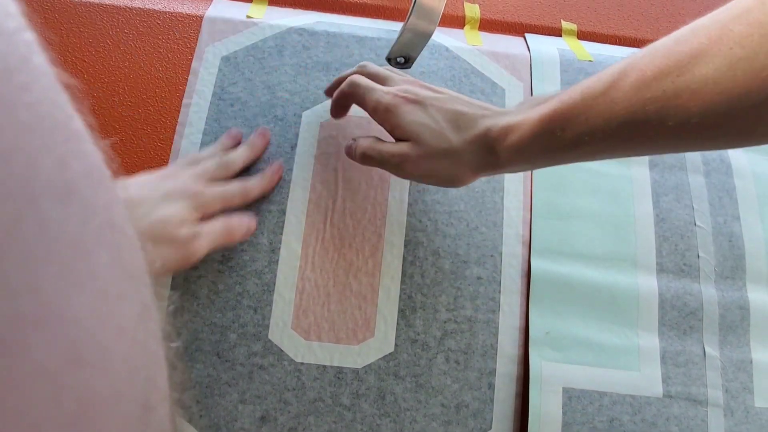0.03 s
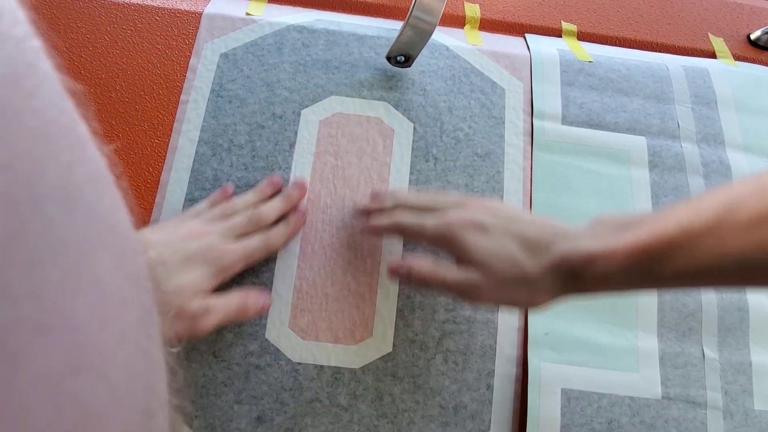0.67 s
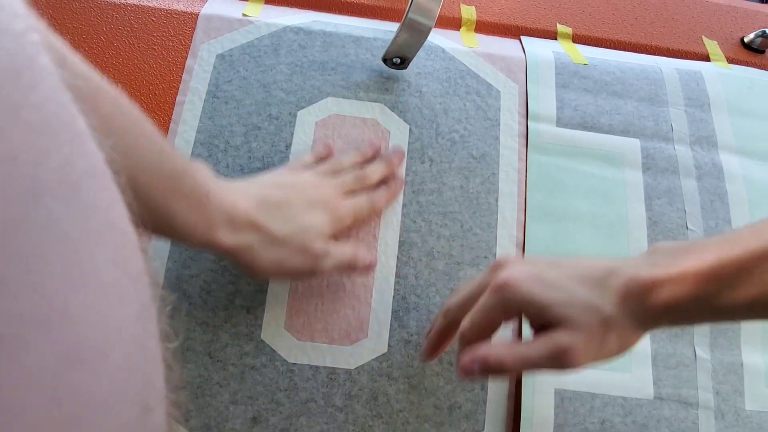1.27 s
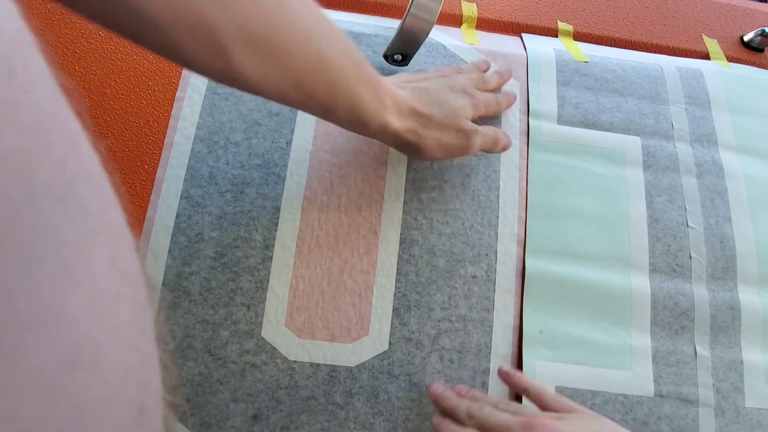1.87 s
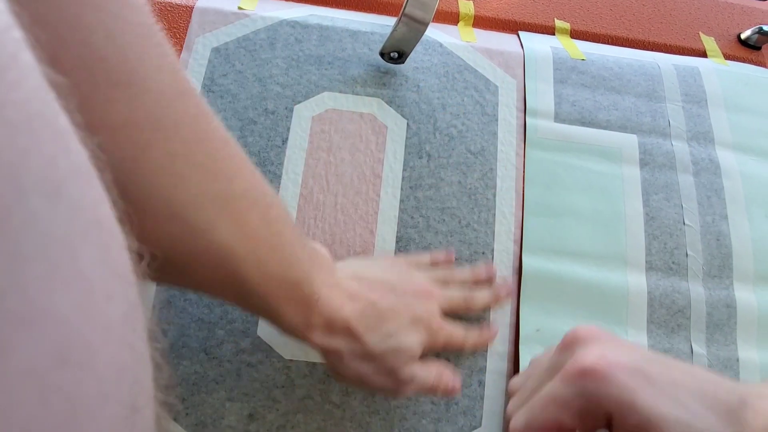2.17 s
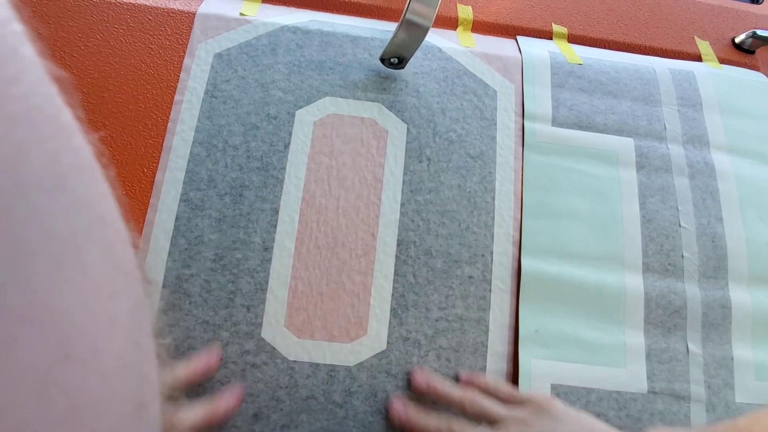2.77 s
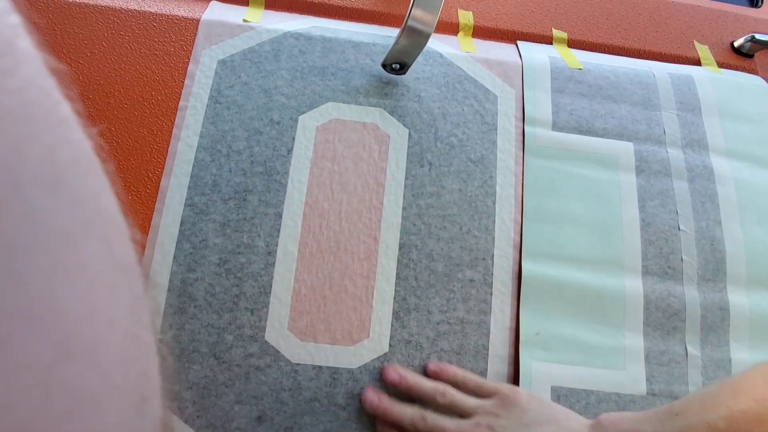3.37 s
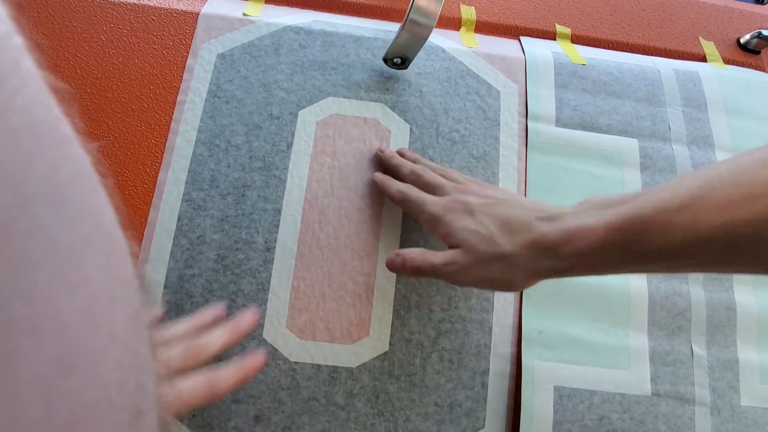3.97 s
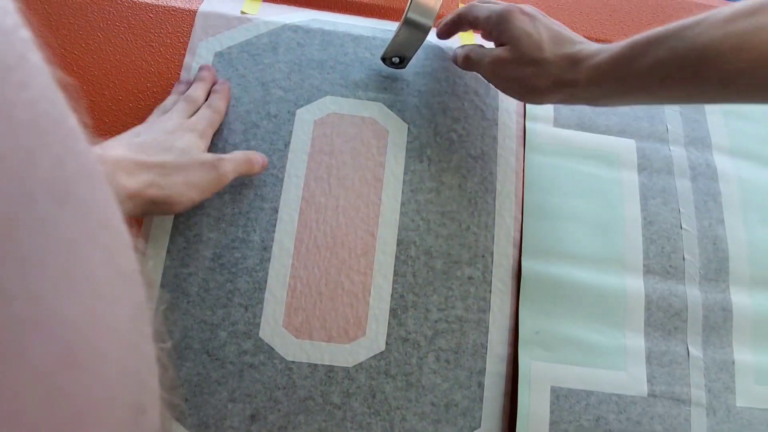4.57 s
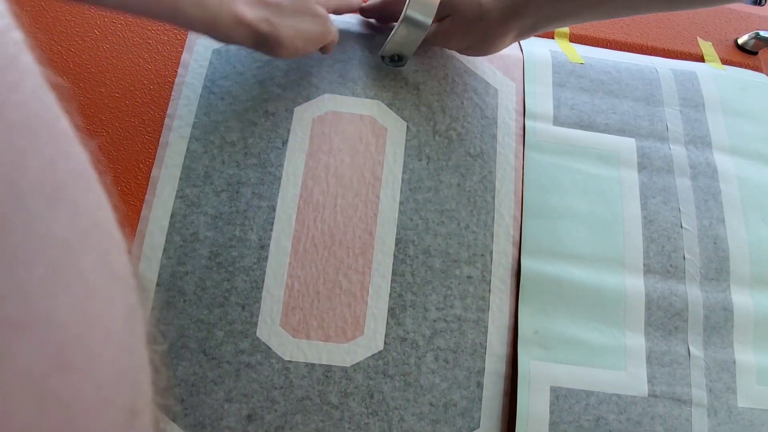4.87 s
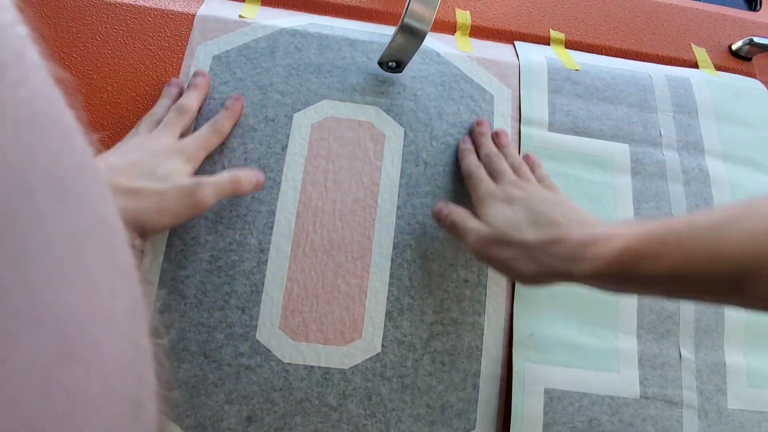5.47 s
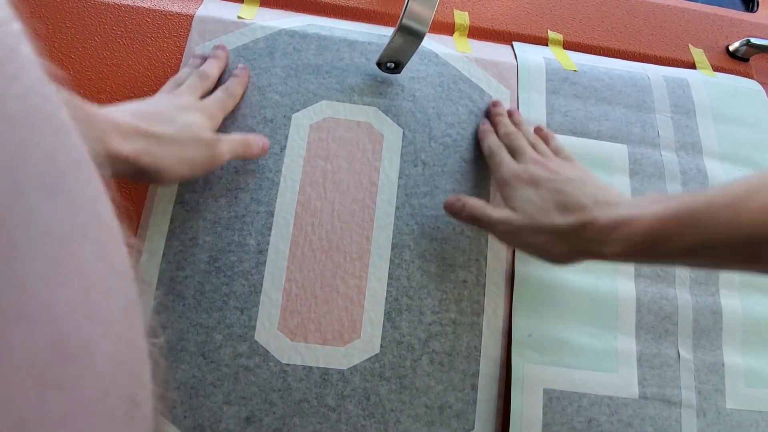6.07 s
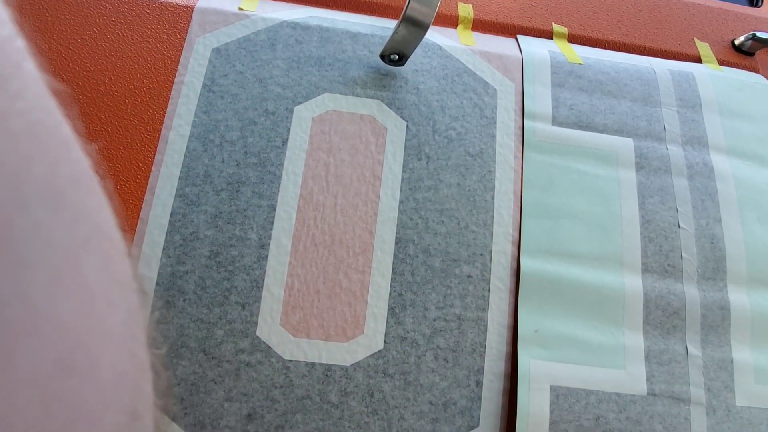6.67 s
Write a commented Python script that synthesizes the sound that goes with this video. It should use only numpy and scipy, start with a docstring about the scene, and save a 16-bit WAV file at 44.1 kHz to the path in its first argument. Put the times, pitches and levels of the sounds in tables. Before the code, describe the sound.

Palms thump softly onto paper laid over a hollow panel and slide across it in a steady run of short, hissing rubs. The textured surface adds a low, boxy shudder, while fingers catch the paper with little ticks and bright scrapes, and gripping skin briefly groans. The microphone is close and in stereo, buffeted a few times by air, most strongly before the middle. A faint outdoor background lies underneath.

```python
"""Outdoors, close up on a hollow, textured panel: two hands smooth a paper-backed vinyl decal onto it.
Each palm lands with a soft thump and a bright pat, then hisses over the paper and sets the panel juddering.
Gripping skin groans, the paper ticks and crinkles, and the right hand gives short, bright scrapes.
An arched palm turns the rub hollow. Puffs of air buffet either microphone port, over a faint outdoor bed."""
import sys
import numpy as np
from scipy import signal
from scipy.fft import rfft, irfft, next_fast_len
from scipy.io import wavfile
from scipy.ndimage import uniform_filter1d, map_coordinates

SR = 44100
rng = np.random.default_rng(int(sys.argv[2]) if len(sys.argv) > 2 else 0)


def master_out(mix):
    """Clip the mix to full scale and print it as 16-bit PCM to the path in sys.argv[1]."""
    frames = np.transpose(np.atleast_2d(mix))
    ceiling = np.clip(frames, -1, 1)
    pcm = np.round(ceiling * 32767).astype(np.int16)
    wavfile.write(sys.argv[1], SR, pcm)


N = 295911

# Tone of the open-air bed: f/Hz, level/dB
AIR_EQ = [(25, -31), (70, 4), (400, -19.5), (750, -25), (1400, -29.5), (2100, -41.5), (5200, -27),
          (7400, -53), (15000, -72)]
# Palm strokes: t/s, length/s, speed-up/s, slow-down/s, right hiss/dB, left rasp/dB,
# first comb peak of the right hand's reflection at the start/Hz, at the end/Hz
STROKES = [(-0.024, 0.44, 0.19, 0.21, -36.5, -51.5, 1300, 750),
           (0.333, 0.406, 0.13, 0.093, -34.5, -49.5, 1400, 1800),
           (0.651, 0.385, 0.16, 0.15, -36.5, -51, 1360, 2700),
           (0.984, 0.43, 0.15, 0.17, -36, -52, 1400, 1800),
           (1.256, 0.42, 0.19, 0.079, -36.5, -54, 1420, 2800),
           (1.648, 0.405, 0.14, 0.14, -34.5, -52.5, 900, 900), (2.05, 0.41, 0.11, 0.07, -35, -54, 900, 800),
           (2.39, 0.21, 0.097, 0.17, -47.5, -53, 1700, 1750),
           (2.695, 0.355, 0.1, 0.12, -34.5, -51.5, 1600, 3000),
           (3.242, 0.49, 0.22, 0.3, -33, -54, 1800, 1350), (3.64, 0.17, 0.06, 0.06, -69, -57, 1700, 1700),
           (3.8, 0.3, 0.1, 0.17, -41, -56, 1700, 1750), (4.138, 0.283, 0.12, 0.097, -37.5, -60, 1100, 800),
           (4.405, 0.49, 0.23, 0.27, -39, -56, 2000, 1500), (4.983, 0.55, 0.34, 0.22, -40, -59, 1400, 900),
           (5.294, 0.651, 0.44, 0.15, -35.5, -56, 1000, 1300),
           (6.155, 0.475, 0.2, 0.08, -35.5, -56.5, 1400, 1900)]
# Tone of the right hand's airy hiss: f/Hz, level/dB
HISS_EQ = [(3000, -40), (8000, -18.5), (10300, -7.5), (11700, -0.5), (13300, -1.5), (15500, -1)]
# Tone of the right hand's rasp: f/Hz, level/dB
RIGHT_RASP_EQ = [(300, -20), (800, -5), (1300, -7), (2200, -7), (4500, 0), (6000, 3), (7800, -5),
                 (9300, -3), (15000, -30)]
# Tone of the left hand's rasp: f/Hz, level/dB
LEFT_RASP_EQ = [(300, -34), (800, 2.5), (1650, 0), (2350, -6.5), (5000, 4), (6200, -4.5), (7450, -22),
                (8400, -8), (15500, -16)]
# Resonance of the air pocket under the left palm: t/s, f/Hz
POCKET_SWEEP = [(1.5, 2450), (3.95, 1650), (4.6, 1720), (5.15, 745), (5.45, 940), (6.5, 2100)]
# The panel's boomy lowest modes: f/Hz, width/Hz, level/dB
LOW_MODES = [(62, 28.4, 3.5), (111.6, 64, -5)]
# The panel's boxy upper modes: f/Hz, width/Hz, level/dB
UPPER_MODES = [(181.7, 48, 1), (231, 60.7, 2), (331, 66, -1.5), (418, 97, -5.5), (713, 360, -19)]
# Palms landing: t/s, thump level/dB, f/Hz, pat level/dB
LANDINGS = [(0, -25.5, 90, -83), (0.708, -28.5, 72.7, -48), (1.02, -31.5, 71, -77), (1.334, -29, 68, -54),
            (1.675, -21.5, 72.4, -58), (2.054, -22, 68.3, -51), (2.7, -27, 76, -53),
            (2.742, -23.5, 67, -53), (3.276, -39.5, 67, -55), (3.821, -32, 170, -62),
            (3.838, -36, 70.2, -74), (4.151, -25, 72.5, -58), (4.455, -21, 107.5, -54.5),
            (5.075, -30, 103, -80), (5.138, -19.5, 135, -48), (6.177, -34, 72.8, -58.5)]
# Skin gripping: centre t/s, level/dB, half length/s, slip rate/Hz
GRIPS = [(0.666, -45.5, 0.054, 290), (0.977, -46.5, 0.059, 200), (1.392, -43, 0.014, 215),
         (1.615, -45, 0.027, 220), (2.43, -39, 0.075, 190), (2.962, -42, 0.026, 400),
         (3.49, -46.5, .06, 330), (3.98, -50, 0.045, 350), (4.373, -43, 0.017, 205), (4.66, -53, 0.13, 315),
         (5.164, -44, 0.04, 230), (5.87, -47.5, 0.025, 190), (6.572, -47, 0.06, 290)]
# Fingers catching on the paper: t/s, level/dB, f/Hz, left minus right/dB
TICKS = [(.654, -31, 2300, 11), (0.659, -35, 1080, 15), (0.908, -36, 2380, 12), (0.946, -34, 1300, 6),
         (0.969, -34, 1400, 4), (0.973, -27, 4700, -6), (1.229, -30, 4200, -10), (1.414, -42, 1200, 17),
         (1.531, -38, 1800, 18), (1.985, -27, 9500, -17), (2.008, -37, 9500, -14), (2.047, -43, 1400, 19),
         (2.479, -37, 2170, 3), (2.518, -37, 960, -4), (2.929, -27.5, 7500, -17), (2.937, -27, 7000, -14),
         (3.509, -28, 6000, -15), (3.89, -35, 4340, -20), (4.623, -37.5, 780, -7)]
# Short crackly bursts, paper crinkles on the left and bright hand scrapes on the right:
# centre t/s, level/dB, half length/s, left minus right/dB
CRACKLES = [(0.93, -46.5, 0.037, 1), (1.522, -53, 0.022, 13), (1.6, -49, 0.015, -15),
            (2.945, -46, .027, -15), (3.51, -50, 0.035, -13), (6.55, -50, 0.028, -13)]
# Tone of the paper crinkle at the left port: f/Hz, level/dB
CRINKLE_EQ = [(400, 5), (2200, 1), (4500, 2), (7500, -20)]
# Tone of the hand scrape at the right port: f/Hz, level/dB
SCRAPE_EQ = [(1800, -10), (6000, 4), (8000, -1), (13000, 2)]
# The palm arching: centre t/s, level/dB, half length/s, f/Hz
CUPS = [(1.2, -62, .08, 1700), (3.98, -61, .045, 1750), (4.64, -62, .08, 1750), (5.42, -64.5, .12, 900)]
# Air hitting a port: centre t/s, level/dB, half length/s, side (0 left, 1 right)
PUFFS = [(1.531, -29, 0.0095, 0), (2.408, -16.5, 0.013, 1), (2.478, -25.5, 0.096, 1),
         (3.585, -31, 0.014, 0)]


def amp(db):
    """Decibels to gain."""
    return 10 ** (np.asarray(db) / 20)


def unit(x):
    """Scale to rms 1."""
    return x / np.sqrt(np.mean(x ** 2) + 1e-20)


def curves(rows):
    """One automation curve for each column after the time."""
    s, *cols = np.transpose(rows)
    return [np.interp(np.arange(N) / SR, s, c) for c in cols]


def wobble(rate):
    """A smooth random curve, rate knots a second."""
    return map_coordinates(rng.standard_normal(int(N * rate / SR) + 4), [np.arange(N) * rate / SR])


def bump(s, half_length):
    """A bell-shaped swell around time s."""
    return np.exp(-.5 * ((np.arange(N) / SR - s) / half_length) ** 2)


def filtered(x, response):
    """x through a complex frequency response."""
    m = next_fast_len(N + SR // 2)
    return irfft(rfft(x, m) * response(np.fft.rfftfreq(m, 1 / SR)), m)[..., :N]


def coloured(x, eq):
    """x through an EQ curve of (f/Hz, level/dB) points, at rms 1."""
    f, db = np.transpose(eq)
    return unit(filtered(x, lambda hz: amp(np.interp(np.log(hz + 1), np.log(f), db))))


def resonance(hz, centre, width):
    """Band-pass response of one mode."""
    return 1j * hz * width / (centre ** 2 - hz ** 2 + 1j * hz * width)


def ringing(x, modes):
    """x through a bank of modes of alternating polarity, at rms 1."""
    return unit(filtered(x, lambda hz: sum((-1) ** k * amp(db) * resonance(hz, centre, width)
                                           for k, (centre, width, db) in enumerate(modes))))


def pan(left_db):
    """Stereo gains for a left-minus-right level difference."""
    return amp([[left_db / 2], [-left_db / 2]])


def add(track, s, sound):
    """Mix a sound in at time s."""
    part = track[..., max(round(s * SR), 0):][..., :sound.shape[-1]]
    part += sound[..., :part.shape[-1]]


def open_air():
    """A faint, steady outdoor bed, stronger on the left."""
    air = 0.33 * rng.standard_normal(N) + rng.standard_normal((2, N))
    return amp(-55.5) * coloured(air, AIR_EQ) * pan(7.8)


def mic_hiss():
    """The microphone's own faint noise floor."""
    return amp(-77.5) * rng.standard_normal((2, N))


def friction(catches_per_s, spread_db, share, flutter_db):
    """Countless tiny slips of skin on paper fibres, with sparser catches on the pebbled coating."""
    impulses = (rng.random(N) < catches_per_s / SR) * rng.choice([-1, 1], N)
    catches = impulses * amp(spread_db * np.minimum(rng.exponential(size=N), 4))
    grain = rng.standard_normal(N) + share * unit(catches)
    return grain * amp(flutter_db * (wobble(25) + wobble(130)))


def sliding(level_db, speed_power, lean_db):
    """Rub envelope: the hand speeds up, glides and slows, leaning in by lean_db over each stroke."""
    t, energy = np.arange(N) / SR, np.zeros(N)
    ease = lambda u: np.sin(np.pi / 2 * np.clip(u, 0, 1))
    for (s, length, rise, fall, *_), db in zip(STROKES, level_db):
        on = (t > s) & (t < s + length)
        age = t[on] - s
        speed = ease(age / rise) * ease((length - age) / fall)
        pressure = amp(db + lean_db * (age / length - .5))
        energy[on] += (pressure * speed ** speed_power) ** 2
    return np.sqrt(energy)


def panel_reflection(x, echo):
    """The panel mirrors the rub's duller part; the detour shifts with the hand, sweeping a comb."""
    t, delay_s = np.arange(N) / SR, np.zeros(N)
    for s, length, *_, first_hz, last_hz in STROKES:
        delay_s[t > s] = np.interp(t[t > s], [s, s + length], [1 / first_hz, 1 / last_hz])
    dull = filtered(x, lambda hz: 1 / (1 + (hz / 3300) ** 4))
    return unit(x + echo * map_coordinates(dull, [(t - delay_s) * SR], order=1))


def palm_pocket(x, boost_db, relative_width):
    """The pocket between palm and paper lifts a band that moves as the hand cups and flattens."""
    hz, t, spectrum = signal.stft(x, SR, nperseg=512)
    centre = np.interp(t, np.arange(N) / SR, curves(POCKET_SWEEP)[0])
    lift = np.abs(resonance(hz[:, None], centre, relative_width * centre)) ** 2
    return unit(signal.istft(spectrum * amp(boost_db * lift), SR, nperseg=512)[1][:N])


def hand_rubs():
    """Palms rub the paper, each heard by the port on its side; the left is shaded and duller."""
    right_db, left_db = np.transpose(STROKES)[4:6]
    fine_grain = friction(catches_per_s=400, spread_db=3, share=0.48, flutter_db=0.96)
    hiss = sliding(right_db, speed_power=2.3, lean_db=0) * coloured(fine_grain, HISS_EQ)
    scrape = lambda: friction(catches_per_s=200, spread_db=4.5, share=0.44, flutter_db=0.94)
    combed = panel_reflection(coloured(scrape(), RIGHT_RASP_EQ), echo=.6)
    right_rasp = sliding(right_db - 11, speed_power=2, lean_db=6.5) * combed
    hollow = palm_pocket(coloured(scrape(), LEFT_RASP_EQ), boost_db=5.5, relative_width=0.52)
    left_rasp = sliding(left_db, speed_power=1, lean_db=7) * hollow
    return np.array([left_rasp, right_rasp + hiss])


def palm_weight():
    """The hand's weight on the panel, greatest on landing and then easing off."""
    s, db = np.transpose(LANDINGS)[:2]
    t = np.arange(N) / SR
    last = np.maximum(np.searchsorted(s, t, side="right") - 1, 0)
    age = t - s[last]
    return uniform_filter1d(amp(-30 + 0.4 * db[last] - 46.7 * age), SR // 30)


def gripping():
    """Envelope of the skin's grip on the panel."""
    return sum(amp(db) * bump(s, half) for s, db, half, _ in GRIPS)


def panel_judder():
    """Dragging, gripping skin shakes the panel; the hand's weight adds to the boom of its low modes."""
    drag = sliding(np.transpose(STROKES)[4] - 21, speed_power=0.65, lean_db=10)
    grip = amp(-3.5) * gripping()
    shaking = lambda spread: rng.standard_normal(N) + spread * rng.standard_normal((2, N))
    shudder = filtered(shaking(spread=0.53), lambda hz: 1 / (1 + (hz / 1200) ** 4))
    judder = ringing(shudder, UPPER_MODES) * np.hypot(drag, grip) * amp(2.9 * wobble(35))
    load = palm_weight() + amp(4) * drag + amp(-8) * grip
    boom = load * ringing(shaking(spread=0.42), LOW_MODES)
    return judder + boom * pan(-0.91)


def palm_thumps():
    """A palm slaps the upper modes and swells a low note; stiffer contact is higher and quicker."""
    out, t = np.zeros(N), np.arange(SR // 3) / SR
    modes = sum(amp(db) * np.exp(-np.pi * width * t) * np.sin(2 * np.pi * hz * t)
                for hz, width, db in UPPER_MODES)
    slap = amp(-13.5) * (1 - np.exp(-t / 0.0025)) * modes
    for s, db, hz, _ in LANDINGS:
        rise_s = 0.022 * (70 / hz) ** 2.3
        swell = (t / rise_s * np.exp(1 - t / rise_s)) ** 2
        add(out, s, amp(db) * (swell * np.sin(2 * np.pi * hz * t) + slap))
    return out * pan(-3.5)


def skin_pats():
    """Skin meets paper with a short, bright pat: a crisp first touch, then the palm settling."""
    envelope, t = np.zeros(N), np.arange(SR // 4) / SR
    touch, settle = amp(-6 - 60 * t / 0.0066), amp(-60 * t / 0.087)
    for s, _, _, db in LANDINGS:
        add(envelope, s, amp(db) * (touch + settle))
    bright = coloured(rng.standard_normal((2, N)), [(1000, -8.5), (6000, 1), (12000, 6)])
    return envelope * bright * pan(-16)


def skin_groans():
    """Gripping skin sticks and slips almost regularly: a short, low, wavering groan."""
    slip_hz = curves(GRIPS)[-1] * np.exp(0.09 * wobble(90))
    phase = 2 * np.pi * np.cumsum(slip_hz) / SR
    tone = np.sin(phase) + amp(-18) * np.sin(2 * phase)
    groan = unit(tone * amp(2.5 * wobble(60)))
    return amp(-2.5) * gripping() * groan * pan(-4)


def paper_ticks():
    """A finger catches the paper: a sharp snap with a brief crackling tail."""
    out, t = np.zeros((2, N)), np.arange(SR // 20) / SR
    f = np.fft.rfftfreq(len(t), 1 / SR)
    for s, db, hz, left_db in TICKS:
        burst = (t == 0) + rng.standard_normal(len(t)) * amp(-13 - 60 * t / 0.013)
        snap = irfft(rfft(burst) * resonance(f, hz, 1.7 * hz) ** 2)
        add(out, s, amp(db) * pan(left_db) * snap / np.abs(snap).max())
    return out


def crinkles_and_scrapes():
    """Short crackly bursts: paper crinkles at the left port, bright hand scrapes at the right."""
    snaps = np.array([coloured(friction(catches_per_s=600, spread_db=5, share=1.8, flutter_db=1), eq)
                      for eq in (CRINKLE_EQ, SCRAPE_EQ)])
    return snaps * sum(amp(db) * bump(s, half) * pan(left_db) for s, db, half, left_db in CRACKLES)


def cupped_palm():
    """Air trapped under an arched palm rings with the rubbing: a hollow rasp."""
    out = np.zeros(N)
    for s, db, half, hz in CUPS:
        out += amp(db) * bump(s, half) * ringing(rng.standard_normal(N), [(hz, 0.3 * hz, 0)])
    return out * pan(-4)


def air_puffs():
    """Eddies of air push on one port at a time: a few slow, uneven swings of pressure."""
    out = np.zeros((2, N))
    swing_hz = 78 * np.exp(0.36 * wobble(110))
    swings = np.sin(2 * np.pi * np.cumsum(swing_hz) / SR)
    eddies = coloured(rng.standard_normal(N), [(20, -24), (60, 4), (180, -11), (1000, -49), (4000, -58.5)])
    pressure = unit(swings + .5 * eddies)
    for s, db, half, side in PUFFS:
        out[int(side)] += amp(db) * bump(s, half) * pressure
    return out


def scene():
    """The stereo mix of hands, panel, paper and air."""
    rubbing = hand_rubs() + cupped_palm() + panel_judder() + skin_groans()
    landings = skin_pats() + palm_thumps()
    crackle = paper_ticks() + crinkles_and_scrapes()
    return rubbing + landings + crackle + air_puffs() + open_air() + mic_hiss()


def record(dry):
    """The microphone chain rolls off the sub-bass and cuts the very top steeply."""
    low_hz, top_hz = 30, 15950
    return filtered(dry, lambda hz: hz ** 4 / (hz ** 4 + low_hz ** 4) / (1 + (hz / top_hz) ** 300))


dry = scene()
out = record(dry)
master_out(out)
```